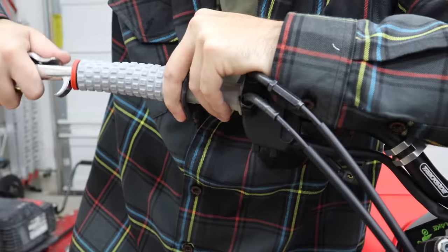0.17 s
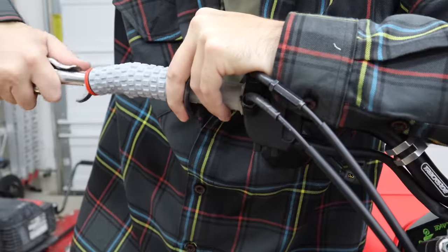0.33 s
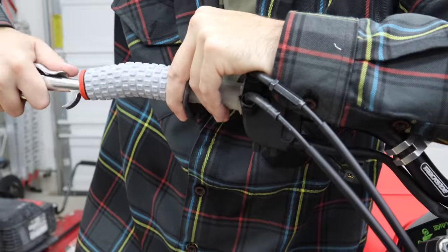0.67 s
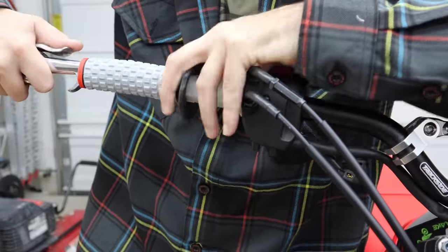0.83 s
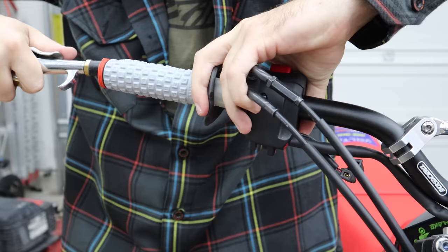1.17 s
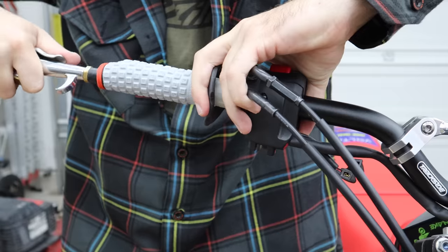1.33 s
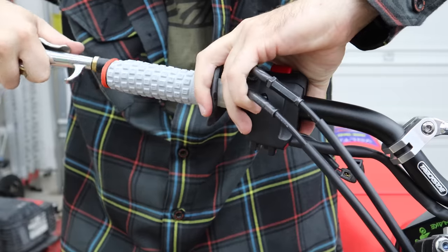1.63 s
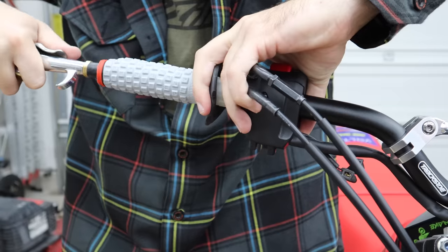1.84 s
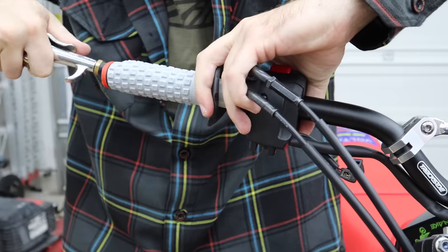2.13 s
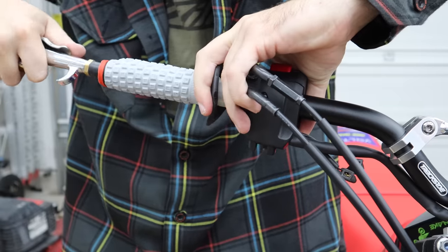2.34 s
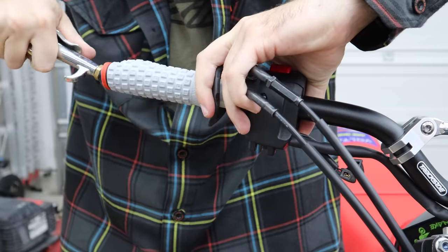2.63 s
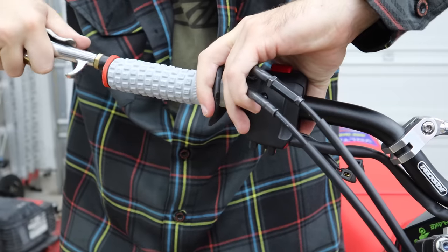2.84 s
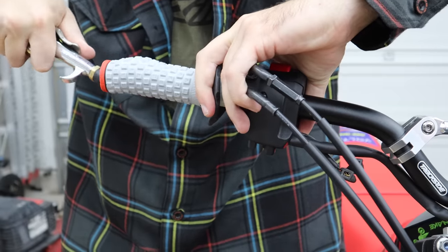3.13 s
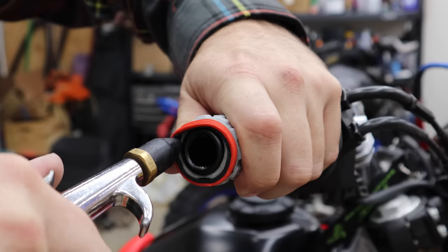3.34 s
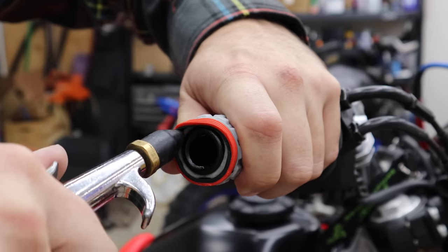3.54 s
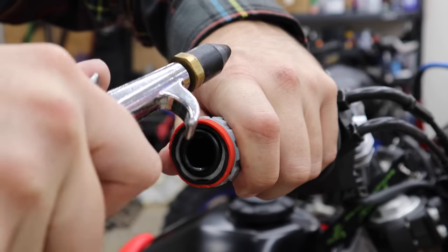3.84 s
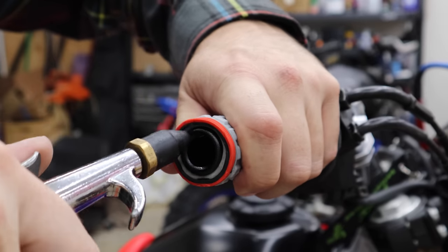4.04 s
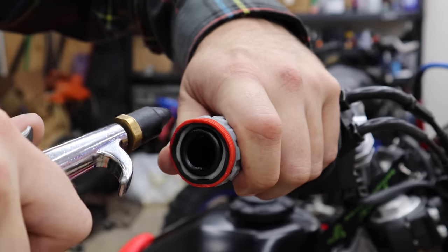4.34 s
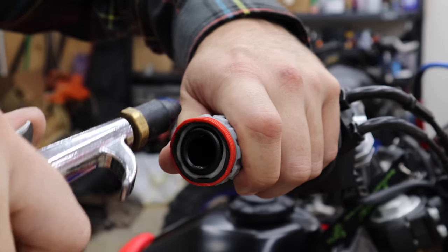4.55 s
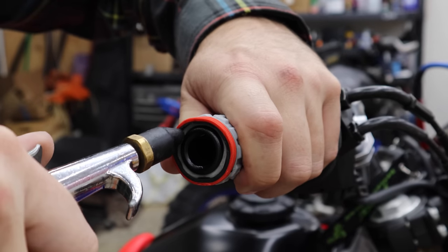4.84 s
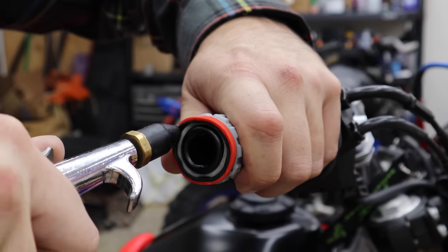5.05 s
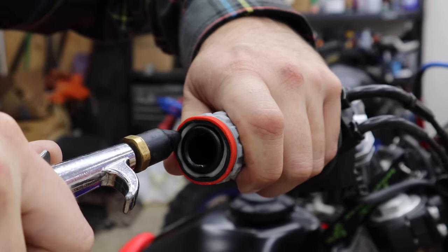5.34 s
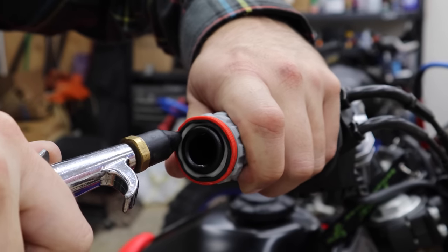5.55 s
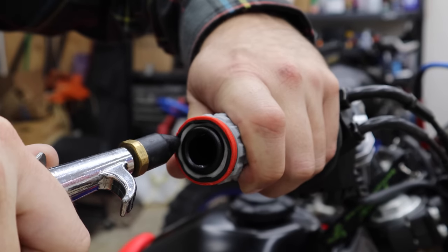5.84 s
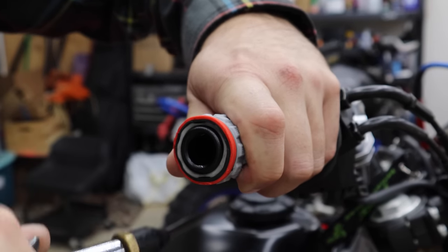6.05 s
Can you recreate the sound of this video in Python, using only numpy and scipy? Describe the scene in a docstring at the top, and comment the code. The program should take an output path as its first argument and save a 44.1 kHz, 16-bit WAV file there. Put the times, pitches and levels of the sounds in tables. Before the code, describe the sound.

Close microphones on an air nozzle working under a rubber grip: harsh, uneven hiss with splashy lower noise and brief whistling chirps, a short drop, a long steady blast, then a drier close jet. It stutters and thins into a subdued tubular whoosh for about a second. A low air thump precedes the final sizzling blast. The garage adds slight room ring.

```python
"""Air blow gun under a rubber grip

A compressed-air gun blasts under a handlebar grip in a garage, heard from the side, the front and close by in turn.
The jet is flickering noise in three bands: splash off the rubber, hiss, and sizzle of the nozzle.
The lip of the grip whistles in gliding edge tones; for about a second the nozzle seals and air rushes
through the hollow bar, as noise with the bar's resonances. Band swells, short spits of air, low gusts
on the microphone, a diffuse room ring and a faint rumble complete it."""
import sys
import numpy as np
from scipy import signal
from scipy.fft import rfft, irfft, next_fast_len
from scipy.io import wavfile
from scipy.ndimage import map_coordinates

SR = 44100
rng = np.random.default_rng(int(sys.argv[2]) if len(sys.argv) > 2 else 0)


def wav_record(signal):
    """Record a signal, one row per channel, as 16-bit PCM in the file named by sys.argv[1]."""
    frames = np.transpose(np.atleast_2d(signal))
    bounded = np.clip(frames, -1, 1)
    # unit amplitude maps onto the largest positive 16-bit level
    quanta = np.round(bounded * 32767).astype(np.int16)
    wavfile.write(sys.argv[1], SR, quanta)


N = 272563
T = np.arange(N) / SR
SIZE = next_fast_len(N)
HZ = np.maximum(np.fft.rfftfreq(SIZE, 1 / SR), 1)

FRONT_S, CLOSE_S = 1.182, 3.265  # the front and the close place begin
TOP_HZ = 15750
ATTACK_DB_PER_S = 225
SPLASH_DB_PER_HISS_DB, SIZZLE_DB_PER_HISS_DB = 1, 1.65  # as the hiss rises and fades
SLIP_HISS_DB_PER_SIZZLE_DB = 0.65
FLARE_HALF_WIDTH_HZ = 444  # at 1 kHz; grows as the root of the centre
FLARE_TRIM_DB, TONE_TRIM_DB = -3, 0.5
GARAGE_T60_S = 0.6

# Jet colour from each place: freq_hz, gain_db
SIDE_COLOUR = [(40, -44), (110, -30), (200, -25), (400, -18.5), (700, -10.5), (1300, -4.5), (2400, -5),
               (3600, -6.5), (4700, 0), (6300, -1), (7800, 3.5), (10000, -5), (13000, -0.5), (15500, -6.5)]
FRONT_COLOUR = [(40, -49), (100, -26), (190, -20.5), (300, -18), (600, -7.5), (950, -2), (2700, 3.5),
                (4000, 0.5), (7300, 0.5), (8600, 3), (10600, -2), (12000, 6), (13500, 9.5), (15500, 0.5)]
CLOSE_COLOUR = [(40, -23), (200, -16), (500, -12.5), (1000, -10.5), (2100, -5.5), (3500, -4.5),
                (5800, -2.5), (7000, -0.5), (8300, 3.5), (9300, 0), (10400, -5), (12200, -1), (13600, 1),
                (15500, -2.5)]
# Resonances between nearby garage surfaces: centre_hz, width_hz, lift_db
GARAGE_RESONANCES = [(194.6, 53, 10.5), (370.5, 66, 9), (770, 30, 5.5), (945, 66, 5), (1160, 39, 5),
                     (1475, 41, 0.5), (1717, 78, 3), (1930, 47, 3), (2385, 30, 4.5), (2740, 50, -3.5)]
# Broad colour of air in the hollow bar: freq_hz, gain_db
BAR_COLOUR = [(60, -13), (300, -10.5), (1300, -7), (2200, 0.5), (4600, 1), (6000, -6), (7500, 4.5),
              (10700, -6.5), (13500, 10), (15500, 0)]
# Resonances of the hollow bar: centre_hz, width_hz, lift_db
BAR_RESONANCES = [(2140, 310, 4.7), (3400, 970, 6.5), (4150, 210, 2.2), (5300, 620, 5.7), (7260, 500, 3),
                  (8340, 670, 10.6), (9600, 690, 10.4), (11650, 670, 20), (12730, 800, 18),
                  (14400, 550, 14)]
# Tightness of the nozzle in the grip: time_s, seal_0_to_1
NOZZLE_SEAL = [(4.12, 0), (4.27, .9), (4.42, .97), (4.53, .85), (4.68, 1), (4.97, 1), (5.08, .05),
               (5.12, 0)]
# Air in the bar, before the seal gain: time_s, hiss_db, lows_above_hiss_db, treble_above_hiss_db
BAR_AIR = [(4.22, -47.5, -0.5, 4), (4.418, -47, -3, 3), (4.45, -40.5, -2.5, -4), (4.492, -41, 0.5, -2),
           (4.594, -41, 0, -1), (4.626, -38.5, -8, -6), (4.902, -44.5, -4, 4), (5.05, -34.5, -4, 0)]
# Jet catches an edge and flares: time_s, half_length_s, centre_hz, level_before_trim_db
EDGE_FLARES = [(0.345, 0.064, 6900, -24.5), (.51, .035, 8950, -21.5), (.758, 0.071, 7900, -29),
               (1.248, 0.033, 1960, -26.5), (1.345, 0.052, 6100, -24.5), (1.462, 0.073, 1350, -28.5),
               (1.57, .04, 8600, -24), (1.763, 0.045, 14000, -22.5), (1.805, 0.02, 5950, -24.5),
               (1.873, 0.022, 1530, -22), (2.115, 0.053, 8700, -26), (2.285, .05, 14000, -27),
               (2.55, .03, 3900, -24), (2.994, 0.054, 6100, -25.5), (3.65, 0.029, 533, -43),
               (3.882, 0.011, 5000, -27), (4.543, 0.094, 5700, -41.5), (4.55, .07, 9400, -45),
               (5.295, 0.006, 1800, -33)]
# Whistles at the grip lip, one table each:
# time_s, pitch_hz, level_before_flutter_and_trim_db, overtones_above_fundamental_db
LIP_WHISTLES = [
    [(.105, 3800, -39, -27), (.122, 3600, -29, -20), (.133, 2735, -37, -14), (.148, 2487, -29.5, -8),
     (.165, 2380, -24.5, -20), (.18, 2420, -37, -17)],
    [(.41, 4540, -44, -20), (.435, 4560, -36, -20), (.455, 4620, -44, -20)],
    [(.477, 3700, -34, -12), (.484, 2770, -32, -13), (.505, 2335, -32, 8), (.523, 2340, -31, 5),
     (.54, 2810, -27.5, -4), (.558, 2820, -20.5, -20), (.575, 2690, -32, -18)],
    [(5.74, 1690, -50, -12), (5.8, 1735, -50, -8), (5.9, 1696, -41, 0), (6.0, 1745, -38.5, 4),
     (6.05, 1766, -41, -3), (6.075, 1760, -53, -9)],
]
# Nozzle shifts and spits: start_s, level_db, decay_s
NOZZLE_SPITS = [(1.145, -32, 0.0025), (1.182, -18.5, .004), (3.266, -14.5, 0.0043), (3.853, -17, .004)]
# Low swells on the microphone: time_s, half_length_s, level_db, corner_hz
MIC_GUSTS = [(3.27, 0.0021, -51, 294), (3.588, 0.039, -48.5, 86), (3.85, 0.014, -40.5, 111),
             (4.07, 0.012, -53, 102), (5.228, 0.025, -31.5, 55), (5.297, 0.014, -19.5, 307),
             (5.312, 0.0165, -19.5, 76.4), (5.336, 0.021, -24, 116), (5.426, 0.091, -31, 44.7),
             (5.737, 0.38, -44.5, 222)]
# Stretches of jet noise between dips, before slips:
# start_s, end_s, hiss_db, splash_above_hiss_db, sizzle_above_hiss_db, release_db_per_s
JET_STRETCHES = [(0, 0.848, -27, -4, -3, 51.5), (1.17, 3.265, -29, .5, -2.5, 91),
                 (3.265, 3.82, -28.5, -6.5, 5.5, 250), (3.856, 4.033, -29, -10.5, -0.5, 68),
                 (5.098, 5.12, -28, -9, 5.5, 51), (5.262, 5.301, -26.5, -11, 1, 500),
                 (5.351, 6.18, -31.5, -4, 3.5, 102)]
# Jet slips on the rubber: time_s, half_length_s, sizzle_lift_db, splash_change_db
RUBBER_SLIPS = [(0.043, 0.044, 4, 1.5), (.135, 0.023, 6, -1), (0.424, .025, 3.5, 0.5), (.53, .04, 0, -6.5),
                (0.815, 0.032, 0.5, -3), (1.58, 0.041, 4, 0), (1.672, 0.039, 4.5, -0.5),
                (1.773, 0.03, -2.5, -4.5), (2.02, 0.059, -2.5, 1), (2.142, 0.047, 4, -0.5),
                (2.277, 0.049, -1, -2), (2.46, 0.044, -2.5, 1), (2.67, 0.082, 5, -3),
                (2.862, 0.014, -2.5, 0.5), (3.027, 0.098, 0, -3), (3.257, 0.055, 5.5, -1.5),
                (3.5, 0.058, 0.5, -4.5), (3.768, 0.035, -1.5, -6), (3.871, 0.028, 6.5, 4),
                (6.14, 0.011, 7, -3.5), (6.175, 0.02, 3.5, 8)]


def undb(db):
    """Decibels to gain."""
    return 10 ** (np.asarray(db) / 20)


def unit(x):
    """Scale to rms 1."""
    return x / np.sqrt(np.mean(x ** 2))


def curves(table):
    """Columns of a table, linear in time."""
    time_s, *columns = np.transpose(table)
    return [np.interp(T, time_s, column) for column in columns]


def bell(x, centre, half):
    """Bell that falls to one half at centre +- half."""
    return 2 ** -np.minimum(((x - centre) / half) ** 2, 100)


def below(corner_hz, order):
    """Low-pass gain."""
    return 1 / (1 + (HZ / corner_hz) ** order)


def humps(resonances):
    """Summed lift of resonances, in dB per frequency."""
    return sum(lift_db * bell(HZ, hz, width_hz / 2) for hz, width_hz, lift_db in resonances)


def colour(points, resonances=()):
    """Gain of a broad spectrum with resonant humps."""
    hz, db = np.transpose(points)
    broad_db = np.interp(np.log(HZ), np.log(hz), db)
    return undb(broad_db + humps(resonances))


def filtered(x, gain):
    """Apply a gain per frequency."""
    return irfft(rfft(x, SIZE) * gain, SIZE)[:N]


def noise(gain):
    """Noise of rms 1 with the given spectrum."""
    return unit(filtered(rng.standard_normal(N), gain))


def walk(rate_hz):
    """Random low-passed drift of rms 1."""
    return noise(below(rate_hz, order=4))


def rumble():
    """Faint garage rumble: low-passed noise."""
    return undb(-76.5) * noise(below(130, order=3))


def gusts():
    """Low swells of noise on the microphone, each with its own length and corner."""
    out = 0
    for time_s, half_s, level_db, corner_hz in MIC_GUSTS:
        window = bell(T, time_s, half_s)
        band = below(corner_hz, order=4) * (1 - below(26, order=4))
        swell = unit(window * noise(band))
        out = out + undb(level_db) * swell * np.sqrt(np.mean(window ** 2))
    return out


def garage(x):
    """Diffuse room ring; its tail has met the resonances twice and lost some treble."""
    spectrum = below(7700, order=4) * undb(2 * humps(GARAGE_RESONANCES))
    tail = noise(spectrum) * undb(-60 * T / GARAGE_T60_S)
    return signal.fftconvolve(x, unit(tail[:SR]) / np.sqrt(SR))[:N]


def spits():
    """Sudden bursts of air that die in a few milliseconds."""
    envelope = 0
    for start_s, level_db, decay_s in NOZZLE_SPITS:
        decay = np.exp(-np.abs(T - start_s) / decay_s)
        envelope = envelope + undb(level_db) * (T >= start_s) * decay
    return noise(colour(CLOSE_COLOUR)) * envelope


def whistle(table, pitch_waver=0.0184, flutter_db=3.0, overtone_step_db=-7):
    """Edge tone shaken by the turbulence that drives it; overtones fall off evenly."""
    pitch_hz, level_db, overtone_db = curves(table)
    phase = 2 * np.pi * np.cumsum(pitch_hz * (1 + pitch_waver * walk(315))) / SR
    overtones = unit(sum(undb(overtone_step_db * k) * np.sin((k + 2) * phase) for k in range(3)))
    overtone_gain = undb(overtone_db)
    tone = (unit(np.sin(phase)) + overtone_gain * overtones) / np.hypot(1, overtone_gain)
    sounding = (T > table[0][0]) & (T < table[-1][0])
    return sounding * undb(level_db + flutter_db * walk(130)) * tone


def flares():
    """Short swells of one band of the hiss; higher ones are wider."""
    out = 0
    for time_s, half_s, centre_hz, level_db in EDGE_FLARES:
        half_hz = FLARE_HALF_WIDTH_HZ * np.sqrt(centre_hz / 1000)
        band = noise(bell(HZ, centre_hz, half_hz))
        out = out + undb(level_db) * bell(T, time_s, half_s) * band
    return undb(FLARE_TRIM_DB) * out


def reflections(share, spread_s, count=70):
    """Spectral ripple from short echoes off hands, bike and walls."""
    lags_s = rng.uniform(spread_s / 10, spread_s, count)
    sizes = unit(rng.standard_normal(count))
    echoes = np.zeros(SIZE)
    echoes[(lags_s * SR).astype(int)] = share * sizes / np.sqrt(count)
    return np.abs(1 + rfft(echoes))


def turbulence(gain, flicker_db, rate_hz, count=12):
    """Jet noise; each band flickers with its own eddies, the big, low ones least even."""
    root_centres = np.linspace(0, np.sqrt(TOP_HZ), count)
    depths_db = flicker_db * (1 + 0.82 * bell(root_centres ** 2, 0, 1100))
    air = noise(gain)
    out = 0
    for row, depth_db in zip(np.eye(count), depths_db):
        # overlapping triangles on a root-frequency scale
        band = filtered(air, np.interp(np.sqrt(HZ), root_centres, row))
        out = out + band * undb(depth_db * walk(rate_hz))
    return out


def stretch_fade(start_s, end_s, release_db_per_s):
    """Rise, hold and fall of one stretch of jet noise, in dB re its hold."""
    rise_db = -ATTACK_DB_PER_S * np.maximum(start_s - T, 0)
    return rise_db - release_db_per_s * np.maximum(T - end_s, 0)


def jet_levels(from_s, to_s):
    """Band levels in dB: one fade moves all three, slips on the rubber mostly brighten them."""
    levels_db = []
    for start_s, end_s, hiss_db, splash_db, sizzle_db, release_db_per_s in JET_STRETCHES:
        if from_s < (start_s + end_s) / 2 < to_s:
            fade_db = stretch_fade(start_s, end_s, release_db_per_s)
            splash_db = splash_db + SPLASH_DB_PER_HISS_DB * fade_db
            sizzle_db = sizzle_db + SIZZLE_DB_PER_HISS_DB * fade_db
            levels_db.append(hiss_db + np.array([fade_db, splash_db, sizzle_db]))
    slips_db = 0
    for time_s, half_s, lift_db, change_db in RUBBER_SLIPS:
        if from_s < time_s < to_s:
            shifts_db = [SLIP_HISS_DB_PER_SIZZLE_DB * lift_db, change_db, lift_db]
            slips_db = slips_db + np.outer(shifts_db, bell(T, time_s, half_s))
    hiss_db, splash_db, sizzle_db = np.max(levels_db, axis=0) + slips_db
    return hiss_db, splash_db - hiss_db, sizzle_db - hiss_db


def air_stream(levels_db, air):
    """One stream of air, split at 4 and 10.7 kHz into splash, hiss and sizzle."""
    hiss_db, splash_db, sizzle_db = levels_db
    low, high = below(4000, order=14), below(10700, order=30)
    splash = unit(filtered(air, low))
    hiss = unit(filtered(air, high - low))
    sizzle = unit(filtered(air, 1 - high))
    return undb(hiss_db) * (hiss + undb(splash_db) * splash + undb(sizzle_db) * sizzle)


def wander(x, drift=0.005, rate_hz=3):
    """Slide all resonances a little, as an unsteady hand moves the nozzle."""
    place = np.cumsum(1 + drift * walk(rate_hz))
    return map_coordinates(x, [place], order=5, mode="mirror")


def bar_air(ripple):
    """Air rushing through the hollow bar, coloured by its resonances."""
    air = turbulence(ripple * colour(BAR_COLOUR, BAR_RESONANCES), flicker_db=0.8, rate_hz=19)
    return air_stream(curves(BAR_AIR), wander(air))


def jet():
    """Jet from the side, the front and close by, where the nozzle also seals on the bar."""
    ripple = reflections(share=0.36, spread_s=0.02)
    side_air = turbulence(ripple * colour(SIDE_COLOUR, GARAGE_RESONANCES), flicker_db=1.6, rate_hz=26)
    side = air_stream(jet_levels(0, FRONT_S), side_air)
    front_air = turbulence(ripple * colour(FRONT_COLOUR, GARAGE_RESONANCES), flicker_db=1.42, rate_hz=27)
    front = air_stream(jet_levels(FRONT_S, CLOSE_S), front_air)
    near_ripple = reflections(share=0.3, spread_s=0.012)
    free_air = turbulence(near_ripple * colour(CLOSE_COLOUR), flicker_db=1.0, rate_hz=24)
    free = air_stream(jet_levels(CLOSE_S, T[-1]), free_air)
    seal = np.clip(curves(NOZZLE_SEAL)[0], 0, 1)
    close = np.sqrt(1 - seal) * free + np.sqrt(seal) * bar_air(near_ripple)
    return np.select([T < FRONT_S, T < CLOSE_S], [side, front], close)


def scene():
    """Sum air, whistles, room, gusts and rumble at one microphone; two equal channels."""
    air = jet() + flares() + spits()
    tones = sum(whistle(table) for table in LIP_WHISTLES)
    room = undb(-7) * garage(tones) + undb(-28.5) * garage(air)
    mono = air + undb(TONE_TRIM_DB) * tones + room + gusts() + rumble()
    return np.array([mono, mono])


def record(dry):
    """Steep elliptic low-pass at the top of the band."""
    top_cut = signal.ellip(12, 0.1, 80, TOP_HZ, fs=SR, output="sos")
    return signal.sosfilt(top_cut, dry)


dry = scene()
out = record(dry)
wav_record(out)
```